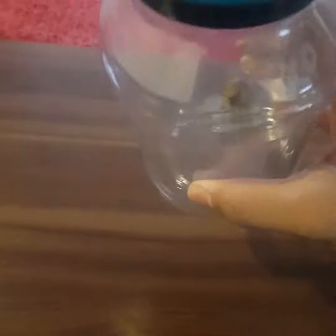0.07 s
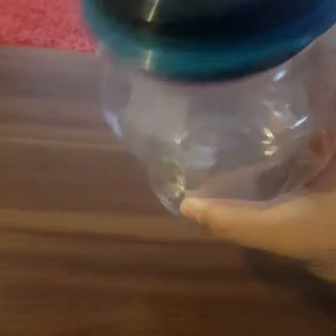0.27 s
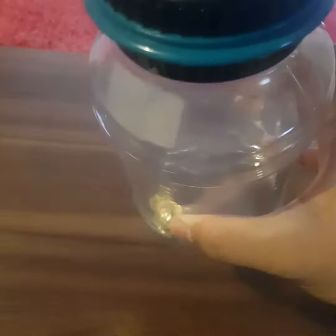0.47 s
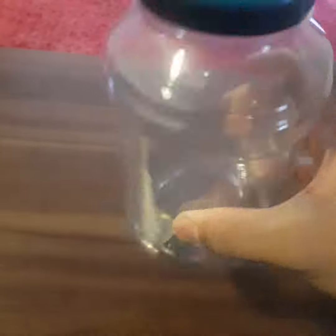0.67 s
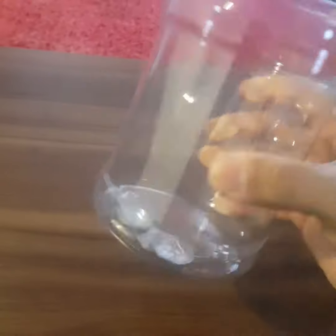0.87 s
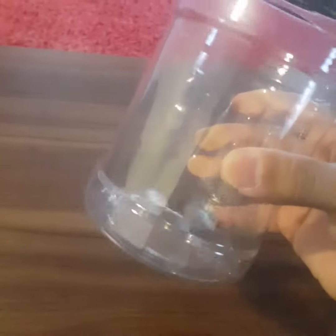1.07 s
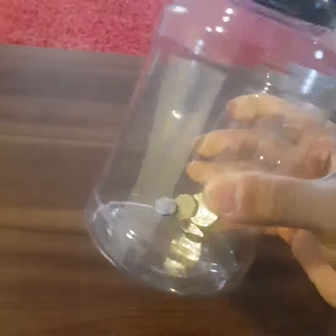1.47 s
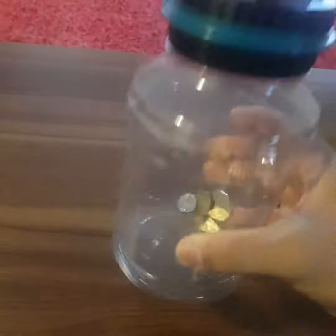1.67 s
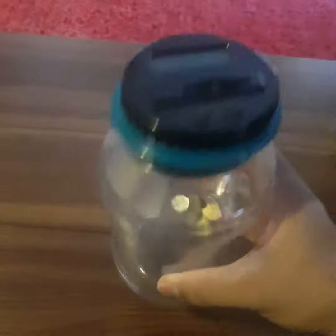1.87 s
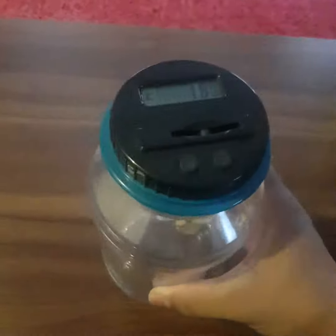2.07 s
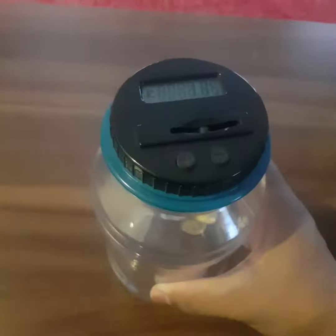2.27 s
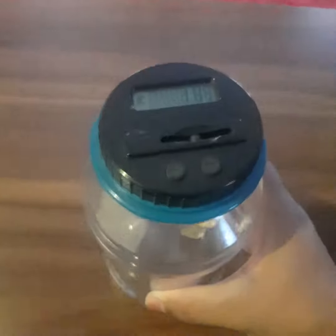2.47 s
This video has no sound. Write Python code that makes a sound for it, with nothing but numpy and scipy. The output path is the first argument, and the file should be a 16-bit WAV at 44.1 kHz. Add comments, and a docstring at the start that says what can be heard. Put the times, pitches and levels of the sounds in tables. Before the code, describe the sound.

Close up in a quiet room, coins clatter against the thin walls of a plastic jar in two quick bursts, skittering between knocks. After a lull with one soft bump, they give a last short rattle as the jar settles.

```python
"""Coins in a plastic jar

A few coins are shaken in a lidded jar, slide as it tilts, and tumble again as it is stood on a wooden
table. Each knock layers a hollow thump of base and air, a crack of thin wall and a bright metal tick;
some leave a coin or the jar ringing. Between knocks the coins skitter along the plastic, and the hand's
grip adds a soft hum. Close up, in a small, quiet room."""
import sys
import numpy as np
from scipy import signal
from scipy.fft import rfft, irfft
from scipy.io import wavfile

SR = 44100
rng = np.random.default_rng(int(sys.argv[2]) if len(sys.argv) > 2 else 0)


def to_wav(sig):
    """Store sig (one row per channel, or 1-D mono) as 16-bit WAV at the path in sys.argv[1].

    Samples outside -1..1 are clipped; the rate is SR.
    """
    pcm = np.clip(np.atleast_2d(sig), -1, 1) * 32767
    pcm = np.round(pcm).astype(np.int16)
    wavfile.write(sys.argv[1], SR, pcm.T)  # frames by channels


N = 110250

# coins knock on the jar, levels before each layer's gain: (time [s], thump [dB], crack [dB], tick [dB])
KNOCKS = [(0.0203, -38, -26.5, -42), (0.0448, -33, -26.5, -44.5), (0.0727, -40, -32, -45.5),
          (0.0904, -39, -28.5, -42), (0.1149, -32, -21, -38), (0.1347, -30.5, -23.5, -36.5),
          (0.1592, -21, -15, -28.5), (0.167, -17.5, -11.5, -20.5), (0.2244, -29, -22, -24.5),
          (0.235, -19.5, -17.5, -32.5), (0.2669, -22.5, -13, -22), (0.2774, -12.5, -4.5, -18),
          (0.3201, -29, -12, -21), (0.401, -21.5, -11.5, -24), (0.4315, -27.5, -17, -34.5),
          (0.4639, -21, -15, -25), (0.476, -31.5, -22.5, -24), (0.5229, -41, -32, -42),
          (0.5964, -43, -28.5, -38.5), (0.6129, -31, -29, -36), (0.6458, -50.5, -30, -47),
          (0.6721, -41, -33, -48), (0.7374, -42, -37, -50.5), (0.872, -45.5, -40, -56.5),
          (0.889, -40.5, -30, -48.5), (1.0045, -28.5, -18, -28), (1.0398, -10, -10, -19.5),
          (1.052, -17, -10.5, -30.5), (1.0692, -18.5, -16, -17), (1.096, -15, -12.5, -30),
          (1.107, -18.5, -14, -18), (1.1231, -23, -14, -28), (1.1631, -18, -27.5, -30),
          (1.172, -23.5, -19, -27.5), (1.192, -22, -19, -23.5), (1.2284, -22, -16, -31.5),
          (1.5499, -35, -39, -68), (1.9512, -49, -44.5, -49.5), (2.0053, -52, -48, -59.5),
          (2.047, -45, -37.5, -56), (2.062, -46, -43, -47.5), (2.113, -57.5, -57.5, -58),
          (2.1868, -25, -25.5, -34), (2.1939, -21, -14.5, -23.5), (2.229, -30.5, -22, -33.5),
          (2.2522, -33.5, -27.5, -49.5), (2.308, -41.5, -43.5, -63.5)]
# the swell and fade of the sliding coins: (time [s], relative level [dB])
SKITTER_CURVE = [(0, -42), (0.1, -31.5), (0.18, -25), (0.249, -28), (0.308, -15.5), (0.367, -28),
                 (0.466, -22), (0.581, -40), (0.799, -49.5), (0.846, -60), (0.912, -34.5), (1.02, -26),
                 (1.169, -24.5), (1.27, -62), (1.4, -69), (1.7, -80), (1.919, -77), (2.057, -39.5),
                 (2.169, -73), (2.22, -28.5), (2.302, -50), (2.448, -74)]
# coins left ringing: (time [s], pitch [Hz], level [dB], t60 [s])
FREE_COIN_RINGS = [(.176, 14500, -17.5, 0.14), (0.596, 10610, -31.5, 0.13), (2.194, 13000, -32, 0.18)]
# the jar rings: short clacks where a coin strikes the wall, longer rings of the wall where no coin damps it,
# and a low ring of the air inside: (time [s], pitch [Hz], level [dB], t60 [s])
JAR_RINGS = [(.401, 2044, -1.5, 0.023), (1.549, 1908, -41.5, 0.28), (1.549, 2640, -39, 0.072),
             (1.549, 253.4, -48, 0.32), (2.194, 1800, -5.5, 0.024), (2.194, 1836, -31.5, .34),
             (2.194, 893, -32.5, 0.23)]
# modes of the base and enclosed air: (pitch [Hz], relative level [dB], t60 [s], left over right [dB])
THUMP_MODES = [(223.7, -14, 0.15, -1), (303.8, -16, 0.14, -5), (455, -15, 0.17, -0.5), (831, -3, 0.054, 6),
               (884.4, 2, 0.04, 2), (1071.4, -9, 0.1, 2)]
# modes of the thin wall: (pitch [Hz], relative level [dB], t60 [s], left over right [dB])
CRACK_MODES = [(1766, -3, 0.054, -3), (1880, -24, 0.3, -3), (1975, 7.5, 0.009, -10), (2535, -14.5, 0.06, 4),
               (2640, -15.5, 0.044, 11), (3354, -10, 0.025, 10.5), (3866, -14.5, 0.06, 10)]
# tone of the dense, short modes of base, wall and coin: (frequency [Hz], relative level [dB])
THUMP_EQ = [(110, -5), (300, 1), (560, -10), (850, 3.5), (1250, -5.5), (1600, -16.5)]
CRACK_EQ = [(800, -29.5), (1300, -4), (1800, 7.5), (2800, 0.5), (4400, -2.5), (6000, -8.5), (7500, -24),
            (10000, -26)]
TICK_EQ = [(5000, -9), (8700, -8.5), (10600, -4), (15700, -8.5)]
# the hand shifts its grip: (centre time [s], half length [s], level [dB])
GRIP_SHIFTS = [(0.048, 0.1, -44), (0.72, 0.18, -51), (2.058, 0.076, -47.5)]
# tone of fingers on plastic: (frequency [Hz], relative level [dB])
RUB_EQ = [(160, -19), (216, 0.5), (480, -9), (620, -28.5)]
# stereo image, centred bass and wide treble: (frequency [Hz], left-right correlation [0-1])
STEREO_IMAGE = [(200, 0.98), (800, 0.37), (1800, 0.2), (4000, 0.017)]
# the room's decay by band: (frequency [Hz], t60 [s])
ROOM_DECAY = [(150, 0.63), (1040, .26), (14000, 0.28)]
# tone of the quiet room: (frequency [Hz], relative level [dB])
HUSH_EQ = [(45, -11), (400, -14.5), (700, -30.5), (7500, -31.5), (15500, -21.5)]

BOUNCE_S, BOUNCE_SHARE = 0.002, 0.42   # a coin lands on its rim, then slaps flat
TIME, TAIL = np.arange(N) / SR, np.arange(SR // 2) / SR   # seconds: whole scene, one decay


def coin_contacts(knock_db, clicks, response, gain_db, skitter_db, swell, spots=12):
    """Knocks and skitter land on random spots of one part, which sounds into the room."""
    pivot_db = -29   # a swell above 1 stretches the skitter's dynamics around this level
    curve_db = np.interp(TIME, *np.transpose(SKITTER_CURVE))
    force = clicks * amp(pivot_db + skitter_db + swell * (curve_db - pivot_db))
    spot = rng.integers(0, spots, N)
    rim = (np.array(KNOCKS)[:, 0] * SR).astype(int)
    slap = rim + (BOUNCE_S * SR * rng.uniform(0.5, 1, len(rim))).astype(int)
    force[rim] = amp(knock_db + gain_db)
    force[slap] = BOUNCE_SHARE * amp(knock_db + gain_db)
    direct = sum(signal.fftconvolve([force * (spot == k)], response(), axes=1)[:, :N]
                 for k in range(spots))
    return direct + amp(-12) * signal.fftconvolve(direct, room_tail(), axes=1)[:, :N]


def base_thump():
    """The jar's base and enclosed air give a hollow thump."""
    return impact(THUMP_MODES, THUMP_EQ, snap_t60=0.014, modes_db=-10, low_hz=160,
                  echo_db=-14, echo_t60=0.1)


def wall_crack():
    """Thin plastic gives a hard, short crack."""
    return impact(CRACK_MODES, CRACK_EQ, snap_t60=0.01, modes_db=-5.5, low_hz=1000,
                  echo_db=-12.5, echo_t60=0.13)


def coin_tick(t60=0.07):
    """Each coin ticks with high modes of its own, soon damped by its neighbours."""
    modes = [(hz, 0, t60, 0) for hz in rng.uniform(10370, 15100, 7)]
    return impact(modes, TICK_EQ, snap_t60=0.016, modes_db=-9, low_hz=5000, echo_db=-7, echo_t60=0.1)


def impact(modes, eq, snap_t60, modes_db, low_hz, echo_db, echo_t60):
    """One contact: a noisy snap, its echoes inside the jar and ringing modes, with the lows rolled off."""
    out = noise(eq, len(TAIL)) * (decay(snap_t60) + amp(echo_db) * decay(echo_t60))
    for hz, db, t60, pan_db in modes:
        # each spot rings a little differently
        spread_db, detune, phase = rng.standard_normal(3) * [3.5, 0.018, 1]
        stereo_phase = phase * np.sqrt(1 - at_hz(STEREO_IMAGE, hz)) * np.array([[1], [-1]])
        tone = np.sin(2 * np.pi * hz * (1 + detune) * TAIL + stereo_phase)
        out += amp(modes_db + db + spread_db) * pan(pan_db) * decay(t60) * tone
    attack = 1 - np.exp(-TAIL * 2 * low_hz)
    low_cut = signal.butter(2, low_hz, "high", fs=SR, output="sos")
    return unit_energy(signal.sosfilt(low_cut, out * attack))


def skitter(clicks_per_s=350, spread_db=3.5, flight_s=0.01):
    """Sliding coins make tiny clicks, which duck after each knock while the coins are airborne."""
    sizes = amp(spread_db * np.minimum(rng.exponential(1, N), 3)) * rng.choice([-1, 1], N)
    clicks = sizes * (rng.random(N) < clicks_per_s / SR)
    knock_times = np.sort(np.append(-1, np.array(KNOCKS)[:, 0]))
    since_knock = TIME - knock_times[np.searchsorted(knock_times, TIME) - 1]
    return clicks / clicks.std() * (1 - np.exp(-since_knock / flight_s))


def free_rings(table, count=6):
    """A coin, the wall or the air in the jar rings in a cluster of close modes that beat roughly."""
    out = np.zeros((2, N + len(TAIL)))
    for time, hz, db, t60 in table:
        pitches = hz + (20 + 0.009 * hz) * rng.uniform(-1, 1, (count, 1))
        phases = rng.uniform(0, 2 * np.pi, (count, 1)) + rng.standard_normal((2, count, 1))
        cluster = np.sin(2 * np.pi * pitches * TAIL + phases).sum(axis=1)
        envelope = decay(t60) * (1 - np.exp(-TAIL / BOUNCE_S))
        gain = amp(db) * np.sqrt(np.sum(envelope ** 2) / 2)   # as strong as one sine at this level
        start = int(time * SR)
        out[:, start:start + len(TAIL)] += gain * unit_energy(cluster * envelope)
    return out[:, :N]


def hand_grip(air_hz=216, width_hz=35):
    """Fingers rub the plastic and the air in the jar hums."""
    effort = sum(amp(db) * np.exp(-((TIME - centre) / half) ** 2) for centre, half, db in GRIP_SHIFTS)
    rub = noise(RUB_EQ, N)
    hum = signal.lfilter(*signal.iirpeak(air_hz, air_hz / width_hz, fs=SR), rub)
    return effort * unit_energy(rub + hum) * np.sqrt(N)


def room_tail(predelay_s=0.0059):
    """Dense reflections die away band by band, the bass last."""
    hz = np.fft.rfftfreq(len(TAIL), 1 / SR)
    reflections = rfft(noise([(20, 0), (SR / 2, 0)], len(TAIL)))
    centres, t60s = np.transpose(ROOM_DECAY)
    out = 0
    for weights, t60 in zip(np.eye(len(centres)), t60s):
        band = at_hz(np.transpose([centres, weights]), hz)
        out += irfft(reflections * band, len(TAIL)) * decay(t60)
    fade_in = np.clip(TAIL / predelay_s - 1, 0, 1)
    return unit_energy(out * fade_in)


def room_hush():
    """A faint, steady bed of rumble and hiss."""
    return amp(-72) * noise(HUSH_EQ, N)


def noise(eq, size):
    """Stereo noise of rms 1, shaped by an EQ curve and rolled off past its ends."""
    hz = np.fft.rfftfreq(size, 1 / SR) + 1
    mid, side = rfft(rng.standard_normal((2, size)))
    correlation = at_hz(STEREO_IMAGE, hz)
    stereo = np.sqrt(1 + correlation) * mid + np.sqrt(1 - correlation) * side * [[1], [-1]]
    roll_off = np.minimum(1, hz / eq[0][0]) ** 2 * np.minimum(1, eq[-1][0] / hz) ** 2
    return unit_energy(irfft(amp(at_hz(eq, hz)) * roll_off * stereo, size)) * np.sqrt(size)


def amp(db):
    """Decibels to gain."""
    return 10 ** (np.asarray(db) / 20)


def at_hz(points, hz):
    """Read a curve on a log-frequency axis."""
    frequencies, values = np.transpose(points)
    return np.interp(np.log(np.maximum(hz, 1)), np.log(frequencies), values)


def unit_energy(x):
    """Scale to a mean energy of one per channel."""
    return x / np.sqrt(np.sum(x ** 2) / 2 + 1e-20)


def pan(db):
    """Stereo gains, left over right by db."""
    return amp(np.array([[db], [-db]]) / 2)


def decay(t60):
    """A fade of 60 dB every t60 seconds."""
    return amp(-60 * TAIL / t60)


def scene():
    """Thump, crack and tick share the same contacts; rings, grip and hush sit beneath."""
    _, thump_db, crack_db, tick_db = np.transpose(KNOCKS)
    clicks = skitter()
    thumps = coin_contacts(thump_db, clicks, base_thump, gain_db=20, skitter_db=-8, swell=1)
    cracks = coin_contacts(crack_db, clicks, wall_crack, gain_db=21.5, skitter_db=-3, swell=1)
    ticks = coin_contacts(tick_db, clicks, coin_tick, gain_db=23, skitter_db=-12.5, swell=1.7)
    rings = free_rings(FREE_COIN_RINGS) + free_rings(JAR_RINGS)
    return thumps + (cracks + ticks) * pan(-1.5) + rings + hand_grip() + room_hush()


def record(dry, ceiling=0.92, cutoff_hz=15800):
    """Soft clipping rounds the peaks and a steep filter trims the top."""
    rounded = ceiling * np.tanh(dry / ceiling)
    return signal.sosfilt(signal.ellip(12, 0.2, 80, cutoff_hz, fs=SR, output="sos"), rounded)


dry = scene()
out = record(dry)
to_wav(out)
```